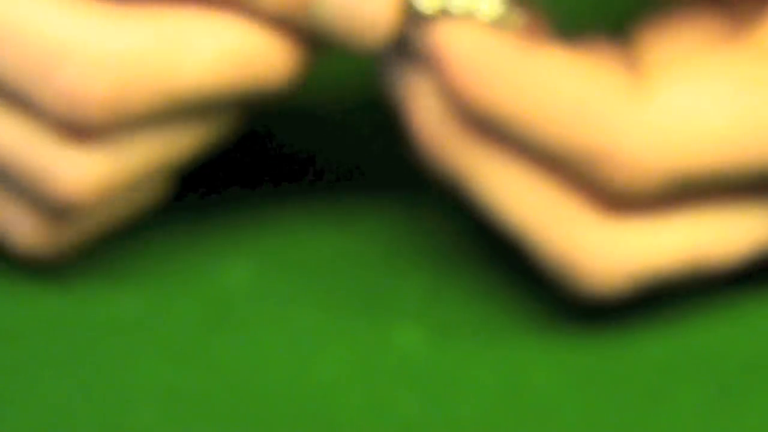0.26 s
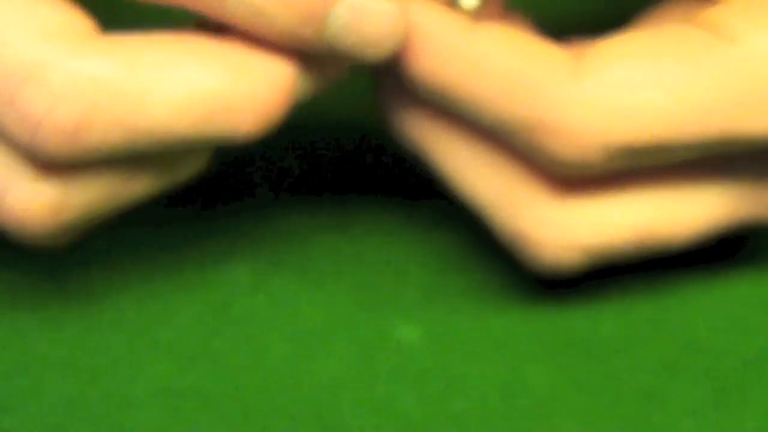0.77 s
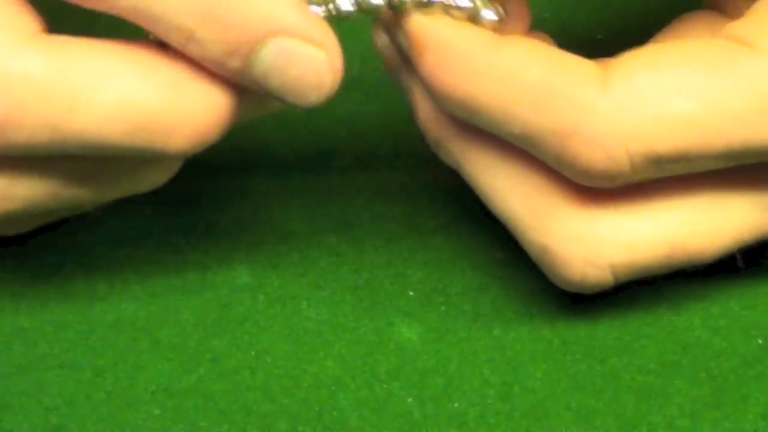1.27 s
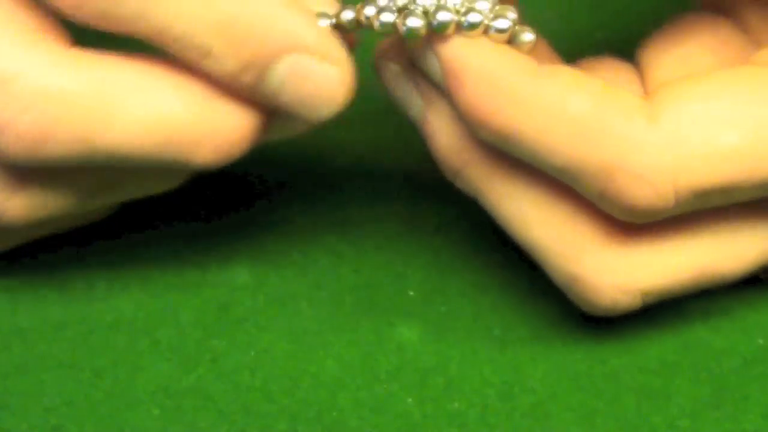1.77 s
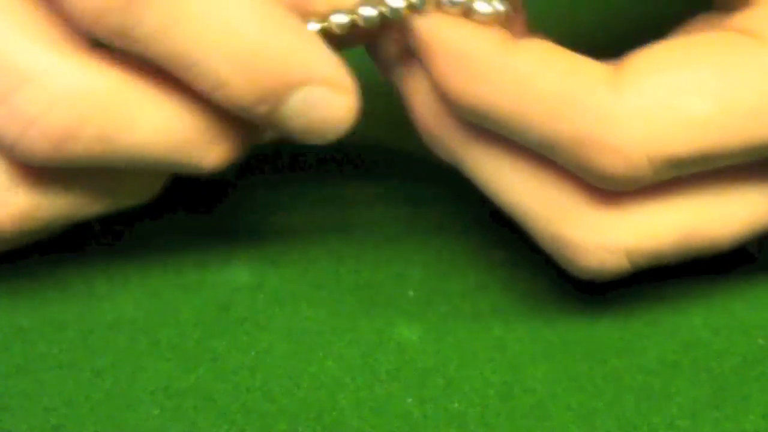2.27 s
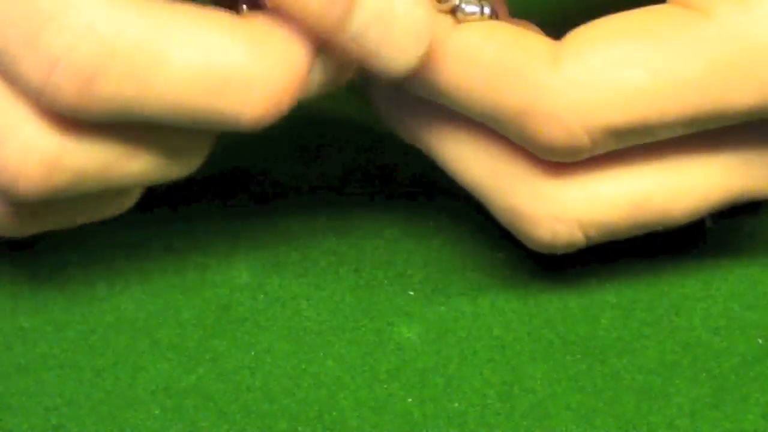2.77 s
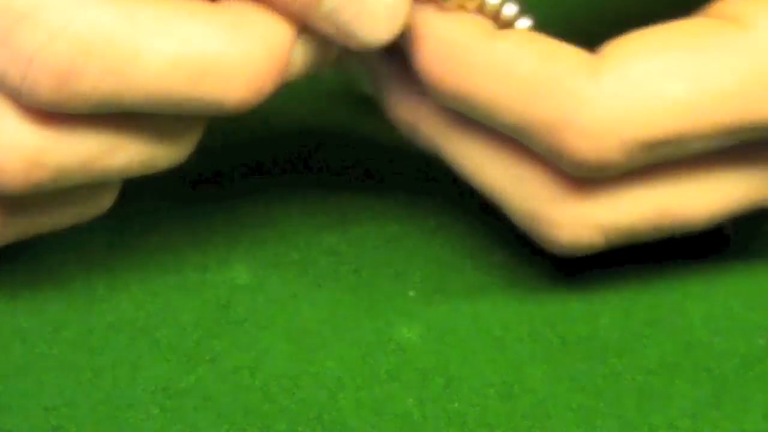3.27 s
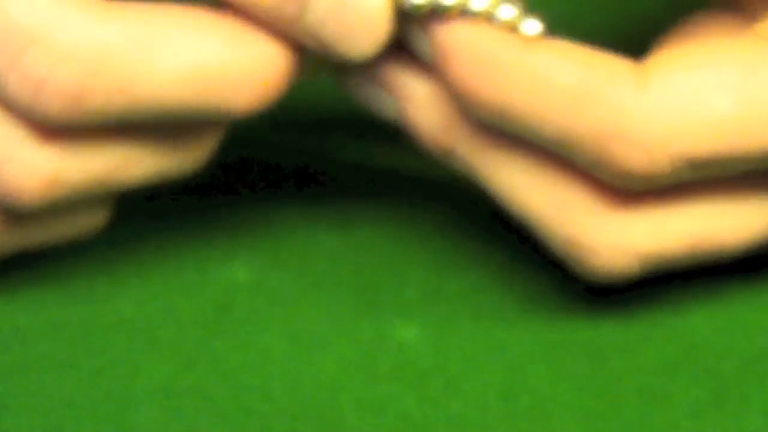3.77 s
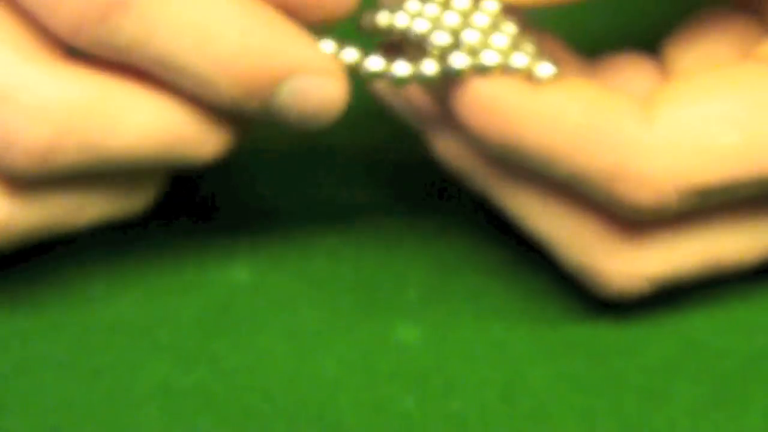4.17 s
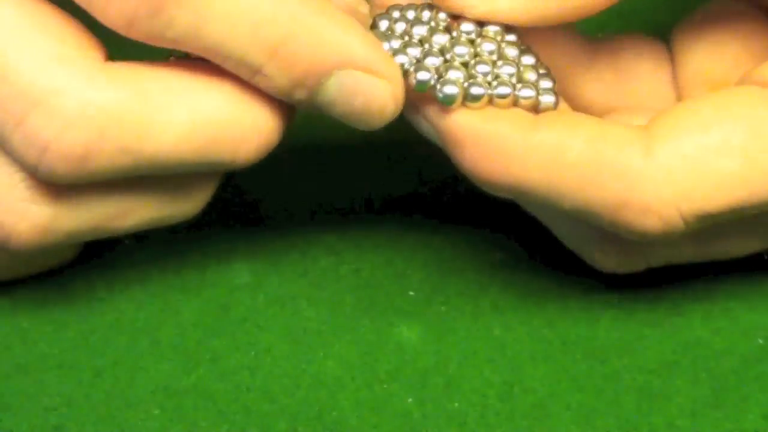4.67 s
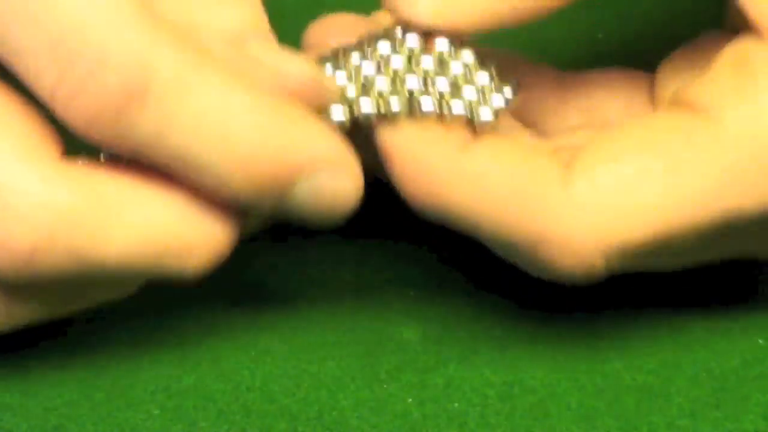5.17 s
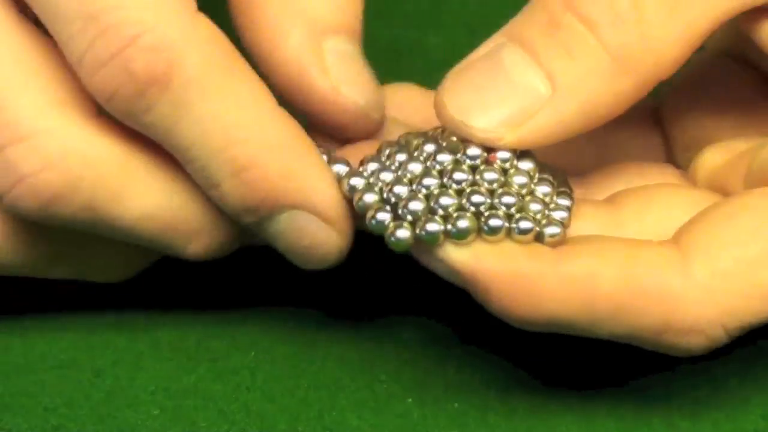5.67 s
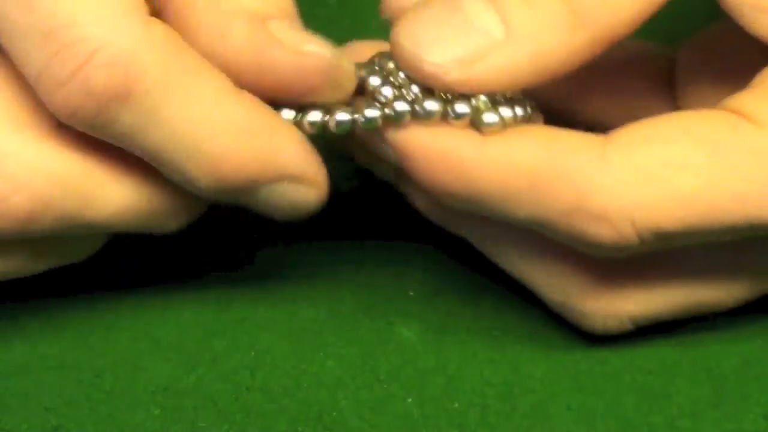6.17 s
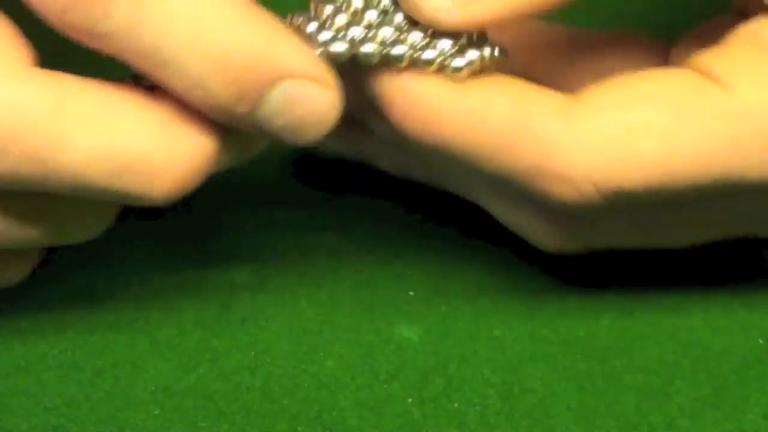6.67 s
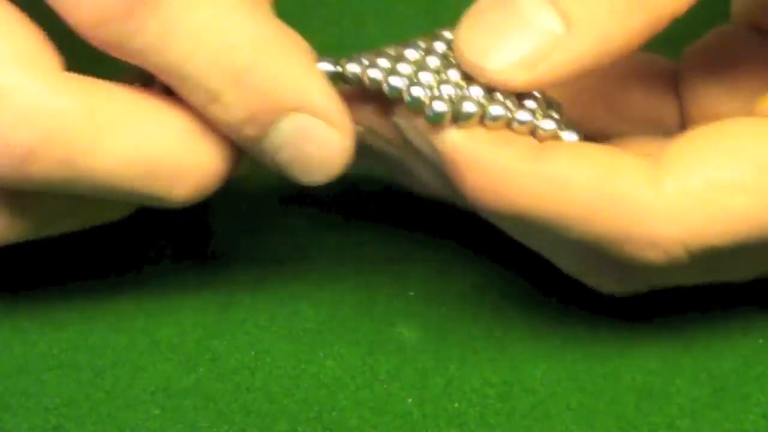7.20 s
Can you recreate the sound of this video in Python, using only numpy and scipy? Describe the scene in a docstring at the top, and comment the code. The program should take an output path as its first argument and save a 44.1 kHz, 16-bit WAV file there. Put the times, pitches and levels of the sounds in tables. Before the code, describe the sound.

Over a constant soft room rumble with faint electrical hum and hiss, faint ticks open, then crisp high steel snaps follow about once or twice a second. Several are quick clusters of contacts. Fingers brush lightly over skin and metal, most noticeably after five seconds. Heard close up indoors, each click dry and sharp with quick wall reflections and a short, bright tail.

```python
"""Room rumble, mains hum, microphone hiss and a faint flicker near 5 kHz come first and run throughout.
Over them, magnetic steel balls peeled off a chain snap onto a cluster in cupped hands over a table.
Each snap is one or several contacts, each a thud and brief rings; near surfaces and the room echo them.
Skin rustles in between: grainy noise that swells with each slide of the fingers."""
import sys
import numpy as np
from scipy import signal
from scipy.fft import rfft, irfft, next_fast_len
from scipy.io import wavfile

SR = 44100
rng = np.random.default_rng(int(sys.argv[2]) if len(sys.argv) > 2 else 0)


def generate_wav(signal):
    """Clip the signal to [-1, 1] and save it as 16-bit WAV at the path in sys.argv[1]."""
    frames = np.transpose(np.atleast_2d(signal))
    scaled = np.clip(frames, -1, 1) * 32767
    pcm = np.round(scaled).astype(np.int16)
    wavfile.write(sys.argv[1], SR, pcm)


N = 328104

# Rumble and hiss common to both sides: (frequency [Hz], relative density [dB per Hz])
AIR_MID = [(15, -74), (25, -36), (68, -9), (107, -5), (179, -7), (241, -6.5), (275, -8.5), (472, -9),
           (540, -13), (1550, -21.5), (4080, -23), (4800, -21), (6280, -25), (8450, -25), (15700, -26.5)]
# Rumble and hiss that differ between the sides: (frequency [Hz], relative density [dB per Hz])
AIR_SIDE_COLOUR = [(15, -56), (25, -25), (241, 0.5), (283, 3.5), (361, 3.5), (652, 6), (7580, -12),
                   (11100, -47), (12300, -55), (13700, -43.5), (15700, -36)]
# Narrow humps and dips in the background: (centre [Hz], width [Hz], gain [dB])
AIR_HUMPS = [(85, 14, 6), (154.6, 8.5, 7.5), (197.4, 10.6, 6.5), (447, 13, -4), (536, 9.8, -1),
             (590, 9.6, -0.5), (633, 18, 2.5), (719, 13, 1), (5140, 140, -1.5), (5620, 91, 3.5),
             (7600, 480, 3), (13700, 96, 8)]
# Mains multiples, appliance tones, electronic whines: (frequency [Hz], mean rms level [dB])
HUM_TONES = [(120, -63), (203, -74), (240, -63), (360, -72), (480, -73.5), (585, -77.5), (636, -75.5),
             (8393, -78), (8629, -80), (10368, -77.5)]
# Steel-on-steel knocks: (time [s], strength [dB], low ring [Hz], high ring [Hz], brightness [dB],
# decay constant of the neighbouring balls' chatter [ms])
KNOCKS = [(0.3042, -27.5, 9240, 11300, 11.5, 0.32), (0.311, -33, 6310, 11350, 5, .35),
          (0.3136, -28, 8400, 11100, 5, .35), (0.4078, -39, 9500, 11300, 15.5, 0.39),
          (1.0676, -21, 8000, 11400, 11.5, .5), (1.3265, -46, 8230, 11390, 6, .35),
          (1.662, -15, 7830, 12300, 6, .46), (1.6625, -33, 7340, 11260, -2, .35),
          (1.8577, -36, 7820, 10920, -4, .35), (1.8601, -28, 8500, 11400, 8.5, 0.48),
          (2.3285, -44, 6310, 10360, -13, .35), (2.5312, -20, 7500, 11900, 8, .6),
          (2.533, -19, 8750, 10800, -8, .35), (2.5347, -21, 7500, 11100, -6, 0.29),
          (2.5357, -35, 7300, 10380, -9, .35), (3.1251, -15, 8100, 10700, -1, 0.87),
          (3.1277, -24, 8140, 10640, -4, .35), (3.1307, -20.9, 8200, 11000, -4, .35),
          (3.1327, -30, 7050, 10800, -3, .35), (3.7067, -19, 8200, 10640, 2, .62),
          (3.7153, -31.5, 8960, 12980, -3, 0.47), (3.7949, -27.5, 8500, 11000, -1.5, 1.0),
          (4.7725, -16, 7070, 10200, -1, 1.3), (4.8116, -32.5, 7320, 11300, -11, .35),
          (4.8899, -19.5, 6730, 12500, -10.5, .9), (5.4977, -49, 7950, 10900, -7, .35),
          (5.674, -9.5, 7900, 12400, -5.5, 0.42), (5.679, -18, 7500, 12000, -4, 0.64),
          (5.8439, -24, 7970, 12700, -7, .35), (6.4201, -16, 8440, 9800, -6.5, 0.67),
          (6.4211, -26, 6960, 12170, -15, .3), (6.433, -34, 8200, 10800, -3, .35),
          (6.4415, -27, 7730, 11200, -6, .35), (6.4436, -31, 6740, 10800, -12, .35),
          (7.061, -36, 8160, 10800, -3, .35), (7.0847, -11.5, 8000, 10300, 3, 0.44),
          (7.0862, -15.5, 8480, 10700, -13, .7), (7.0878, -14, 8700, 11000, -5, .35),
          (7.2941, -43, 8870, 10800, -11, .35), (7.3563, -47, 7970, 10800, -7, .35)]
# Rings of every contact, rows thud, palm, low ring, high ring, fizz: (level at a medium contact [dB],
# gain per strength [dB/dB], gain per brightness [dB/dB], time to peak [ms])
RING_MODES = [(-22.5, 0.32, 0.13, 0.22), (-8, 0.6, .15, 0.25), (1.5, 1, 0, .28), (0.5, 1, 1, 0.19),
              (-6, 1.1, 0.86, 0.19)]
# Changing shape of the cupped hands: (time [s], resonance of the hollow [Hz], its ring gain [dB],
# thud gain [dB], gain let out into the room [dB])
HAND_SHAPE = [(0.3, 4370, 2, 1, 1), (1.07, 5000, 2.5, -5, -1), (1.7, 4900, 0, 3, -2.5),
              (2.5, 4400, -1, 3, -0.5), (3.13, 4130, 0, 1.5, -0.5), (3.8, 4250, 1.5, 2, -1),
              (4.75, 5880, 1, -8, 0), (5.7, 5340, 3.5, -6, -1.5), (5.85, 5100, -6, -8, -2),
              (6.43, 5240, 2, 3.5, 5.5), (7.1, 5000, -1, -1.5, 1)]
# Direct sound off the nearest surfaces: (delay [ms], level [dB], left minus right [dB])
NEAR_BOUNCES = [(1.6, -15, 5), (2.2, -16.5, 4), (3.0, -31, -2)]
# Echoes from walls and ceiling: (delay [ms], relative level [dB], left minus right [dB])
WALL_ECHOES = [(5.84, -17, 4), (6.3, -34, -4), (7.73, -16, -3), (8.28, -33, 2), (15.74, -19, -3),
               (16.36, -24, 0), (23.6, -23, 0), (31, -38, -2)]
# Spectrum the room returns of a contact: (frequency [Hz], relative gain [dB])
ROOM_COLOUR = [(1000, -26), (3500, -20.5), (5000, -14), (5800, -7.5), (6600, -0.5), (8000, -3), (9000, -7),
               (10300, -4.5), (11500, -19), (14000, -27), (15600, -30), (16200, -50)]
# Time for the tail to fall 60 dB: (frequency [Hz], time [s])
TAIL_DECAY = [(2000, 0.31), (4500, 0.27), (7500, 0.2), (11000, 0.14), (16000, 0.084)]
# Fingers sliding over skin and balls: (middle [s], length [s], peak rms level [dB])
SLIDES = [(.61, .1, -68), (0.783, 0.076, -61), (2.18, 0.25, -62.5), (2.32, .1, -61), (3.334, 0.24, -64),
          (3.85, 0.45, -70), (4.67, 0.12, -63), (4.947, .15, -62), (5.065, .08, -58.5), (5.243, 0.23, -52),
          (5.393, .15, -63), (5.59, 0.15, -61), (6.203, 0.18, -65), (6.35, 0.11, -62.5), (7.35, .15, -65)]
# Spectrum of the slides: (frequency [Hz], relative density [dB per Hz])
SLIDE_COLOUR = [(1000, -6), (2500, -13), (4200, -3), (6000, -7.5), (7000, -2.5), (8200, 0.5), (9500, -7.5),
                (12000, -12), (15500, -15)]

AIR_MID_DB, AIR_SIDE_DB = -54.5, -62.5  # rms
HISS_EDGE_HZ, BAND_EDGE_HZ = 15750, 16930
FLICKER_HZ, FLICKER_WIDTH_HZ, FLICKER_RMS_DB = 4830, 460, -70
MEDIUM_DB = -25  # strength of a medium contact
THUD_HZ, FIZZ_HZ = 1760, 14700
CHATTER_DB = -23.5  # against the first blow
PALM_EDGE_HZ, STEEL_TOP_HZ = 3100, 16000  # the rings fall away steeply outside these
ROOM_DB = 16.5  # gain of all that the room returns
ROOM_BRIGHT_DB_PER_DB = 0.41  # sent into the room per dB of brightness
ECHO_SMEAR_MS, SMEAR_SAMPLES = 0.3, 60
TAIL_DB, TAIL_SIDE_DB, DIRECT_SIDE_DB = -13.5, -13, -39


def gain_of(db):
    """Amplitude factor of a level in dB."""
    return 10 ** (np.asarray(db) / 20)


def evened(x):
    """Scales to rms 1."""
    return x / np.sqrt(np.mean(x ** 2) + 1e-20)


def read(points, hz):
    """Interpolates a spectrum table over log frequency."""
    point_hz, value = np.transpose(points)
    return np.interp(np.log(hz + 1), np.log(point_hz + 1), value)


def add(mix, start_s, sound):
    """Adds a sound in place, cut at the end of the mix."""
    part = mix[round(start_s * SR):][:len(sound)]
    part += sound[:len(part)]


def coloured(x, db_of_hz):
    """Shapes a long signal by a spectrum in dB."""
    size = next_fast_len(len(x))
    hz = np.fft.rfftfreq(size, 1 / SR)
    return irfft(rfft(x, size) * gain_of(db_of_hz(hz)), size)[:len(x)]


def wander(corner_hz):
    """Random curve of rms 1: noise smoothed above the corner."""
    steps = rng.standard_normal(4000)
    count = len(steps)
    hz = np.fft.rfftfreq(count, N / SR / count)
    lowpass = (hz > 0) / (1 + (hz / corner_hz) ** 2)
    smooth = irfft(rfft(steps) * lowpass, count)
    return evened(np.interp(np.arange(N) / N * count, np.arange(count), smooth))


def panned(db, left_minus_right_db):
    """Left and right gains as a column."""
    return gain_of([[db + left_minus_right_db / 2], [db - left_minus_right_db / 2]])


def air():
    """Room rumble and microphone hiss: coloured noise, one part common to both sides, one opposed."""
    def details_db(hz):
        humps = sum(db / (1 + (2 * (hz - centre_hz) / width_hz) ** 2)
                    for centre_hz, width_hz, db in AIR_HUMPS)
        return humps - 90 * (hz > HISS_EDGE_HZ)

    mid_noise, side_noise = rng.standard_normal((2, N))
    mid = evened(coloured(mid_noise, lambda hz: read(AIR_MID, hz) + details_db(hz)))
    side = evened(coloured(side_noise, lambda hz: read(AIR_SIDE_COLOUR, hz) + details_db(hz)))
    mid, side = mid * gain_of(AIR_MID_DB), side * gain_of(AIR_SIDE_DB)
    return np.array([mid + side, mid - side])


def hum():
    """Sines of mains, appliances and electronics, wavering a little in level and phase."""
    t = np.arange(N) / SR
    total = np.zeros(N)
    for hz, rms_db in HUM_TONES:
        amplitude = np.sqrt(2) * gain_of(rms_db + 0.64 * wander(1.5))
        cycles = hz * t + 0.048 * wander(3.1)
        total += amplitude * np.sin(2 * np.pi * cycles)
    return total


def flicker():
    """Narrow-band noise whose level jumps quickly up and down at random."""
    def band_db(hz):
        return -20 * np.log10(1 + (2 * (hz - FLICKER_HZ) / FLICKER_WIDTH_HZ) ** 2)

    band = coloured(rng.standard_normal(N), band_db)
    level_db = 12.3 * np.tanh(0.98 * wander(59))
    return gain_of(FLICKER_RMS_DB) * evened(band * gain_of(level_db))


def contact(row, chance):
    """One steel-on-steel knock: a faint thud and four brief rings, repeated by the neighbouring balls."""
    s, strength_db, low_hz, high_hz, bright_db, chatter_ms = row
    ms = np.arange(len(chance)) / SR * 1e3
    shape_s, *shape = np.transpose(HAND_SHAPE)
    palm_hz, palm_db, thud_db, room_db = (np.interp(s, shape_s, column) for column in shape)

    hz = np.array([THUD_HZ, palm_hz, low_hz, high_hz, FIZZ_HZ])[:, None]
    medium_db, per_strength, per_bright, peak_ms = np.transpose(RING_MODES)[:, :, None]
    u = ms / peak_ms
    envelope = (u * np.exp(1 - u)) ** 2
    level_db = MEDIUM_DB + medium_db + per_strength * (strength_db - MEDIUM_DB) + per_bright * bright_db
    rings = gain_of(level_db) * envelope * np.sin(2 * np.pi * hz * ms / 1e3)
    rings[:2] *= gain_of([[thud_db], [palm_db]])

    # squared draws with kept sign: a few knocks stand out
    chatter = gain_of(CHATTER_DB) * chance * abs(chance) * np.exp(-ms / max(chatter_ms, 0.02))
    chatter[0] = 1  # the first blow
    thud = np.convolve(rings[0], chatter)
    steel = np.convolve(rings[1:].sum(0), chatter)
    blow = gain_of(strength_db + room_db + ROOM_BRIGHT_DB_PER_DB * bright_db) * chatter
    return thud, steel, blow


def balls():
    """All contacts: the direct sound, rings band-limited, and the bare blows that the room answers."""
    tracks = np.zeros((3, N))
    for row, chance in zip(KNOCKS, rng.standard_normal((len(KNOCKS), 400))):
        for track, part in zip(tracks, contact(row, chance)):
            add(track, row[0], part)
    thud, rings, blows = tracks
    band = signal.butter(7, [PALM_EDGE_HZ, STEEL_TOP_HZ], "bandpass", fs=SR, output="sos")
    return thud + signal.sosfilt(band, rings), blows


def bounces(direct):
    """Delayed copies of the direct sound off the nearest surfaces."""
    return sum(panned(db, pan_db) * np.roll(direct, round(ms * SR / 1e3))
               for ms, db, pan_db in NEAR_BOUNCES)


def early_echoes(size):
    """Wall and ceiling echoes: each a clear front with decaying random scatter."""
    early = np.zeros((2, size))
    sample = np.arange(SMEAR_SAMPLES)
    smear = 0.33 * np.exp(-sample / (ECHO_SMEAR_MS * SR / 1e3))
    draws = rng.standard_normal((len(WALL_ECHOES), SMEAR_SAMPLES))
    for (ms, db, pan_db), chance in zip(WALL_ECHOES, draws):
        burst = chance * smear + (sample == 0)
        early[:, round(ms * SR / 1e3):][:, :SMEAR_SAMPLES] += burst * panned(db, pan_db)
    return early


def late_tail(size):
    """Sparse random-sign reflections, one per 12 samples, that die band by band."""
    taps = np.zeros((2, size))
    at = np.arange(130, size - 12, 12)
    at = at + rng.integers(0, 12, (2, len(at)))
    np.put_along_axis(taps, at, rng.choice([-1., 1.], at.shape), 1)
    hz, t, bands = signal.stft(taps, SR, nperseg=128)
    decay = gain_of(-60 * t / read(TAIL_DECAY, hz)[:, None])
    mid, side = signal.istft(bands * decay, SR, nperseg=128)[1][:, :size]
    side = side * gain_of(TAIL_SIDE_DB)
    return np.array([mid + side, mid - side]) * gain_of(TAIL_DB) / np.linalg.norm(mid)


def room(blows):
    """Coloured blows convolved with early echoes and a decaying tail."""
    size = SR // 2
    response = early_echoes(size) + late_tail(size)
    shaped = gain_of(ROOM_DB) * coloured(blows, lambda hz: read(ROOM_COLOUR, hz))
    return signal.oaconvolve(shaped[None], response, axes=1)[:, :N]


def rustle():
    """Grainy hiss of skin that swells and fades with each slide of the fingers."""
    grains = rng.standard_normal(N) * gain_of(1.6 * wander(120))
    hiss = evened(coloured(grains, lambda hz: read(SLIDE_COLOUR, hz) - 90 * (hz > HISS_EDGE_HZ)))
    power = np.zeros(N)  # overlapping slides add in power
    for middle_s, length_s, db in SLIDES:
        swell = gain_of(db) * np.hanning(round(length_s * SR))
        add(power, middle_s - length_s / 2, swell ** 2)
    return hiss * np.sqrt(power)


def scene():
    """Steady background plus contacts, their reflections and the rustle, in stereo."""
    background = air() + hum() + flicker() * gain_of([[-1.5], [1.5]])
    near, blows = balls()
    skin = rustle()
    # the two microphone ports differ slightly: a faint late copy, opposed in the sides
    ports = gain_of(DIRECT_SIDE_DB) * np.roll(near + skin, 3) * [[1], [-1]]
    hands = near + skin + ports + bounces(near) + room(blows)
    return background + hands


def record(dry):
    """Band limit: a steep linear-phase low-pass."""
    lowpass = signal.firwin(255, BAND_EDGE_HZ, window=("kaiser", 9), fs=SR)
    return signal.oaconvolve(dry, lowpass[None], "same")


dry = scene()
out = record(dry)
generate_wav(out)
```